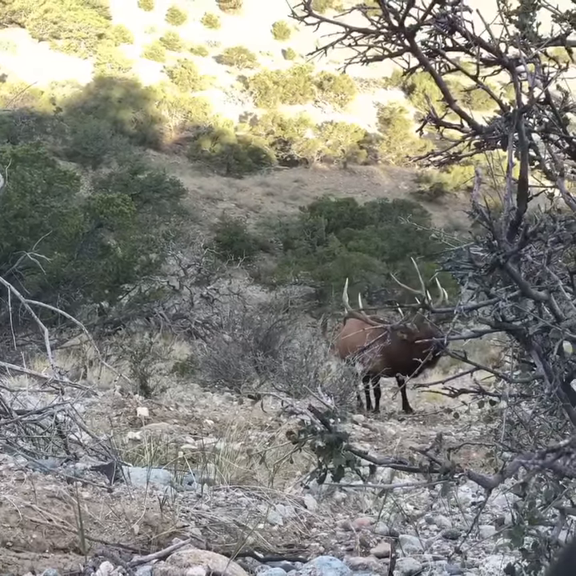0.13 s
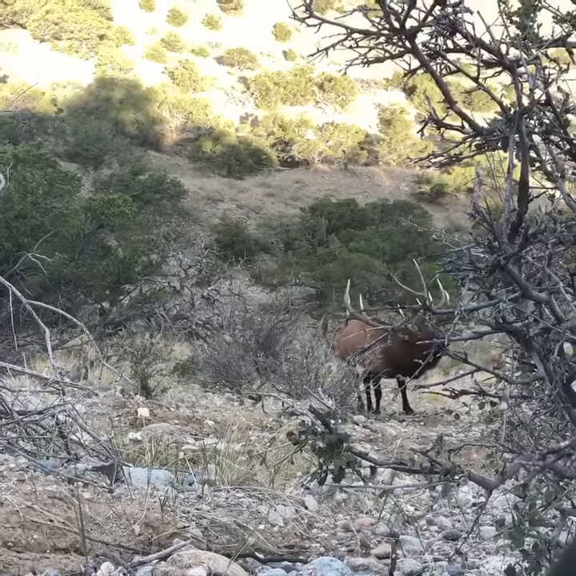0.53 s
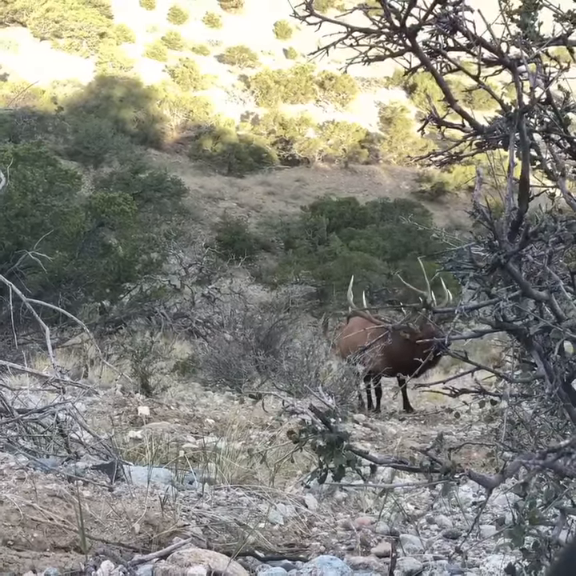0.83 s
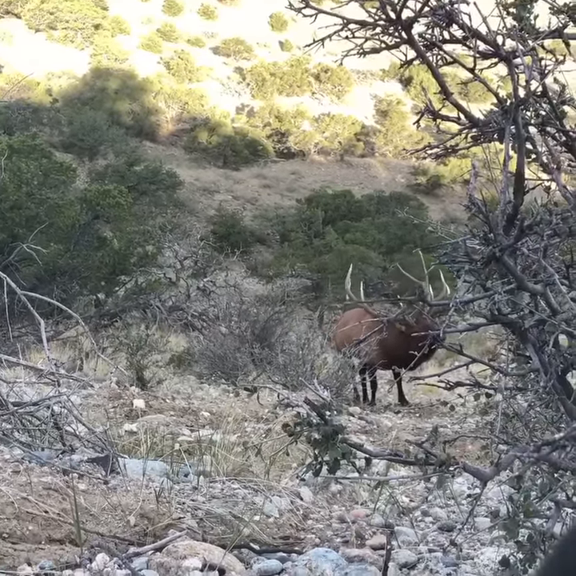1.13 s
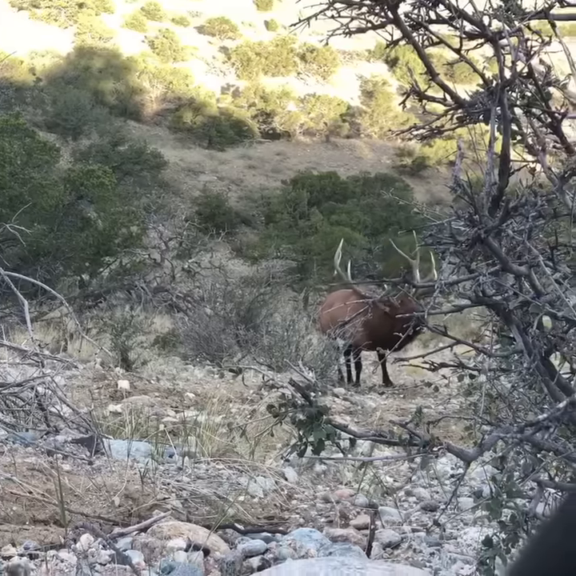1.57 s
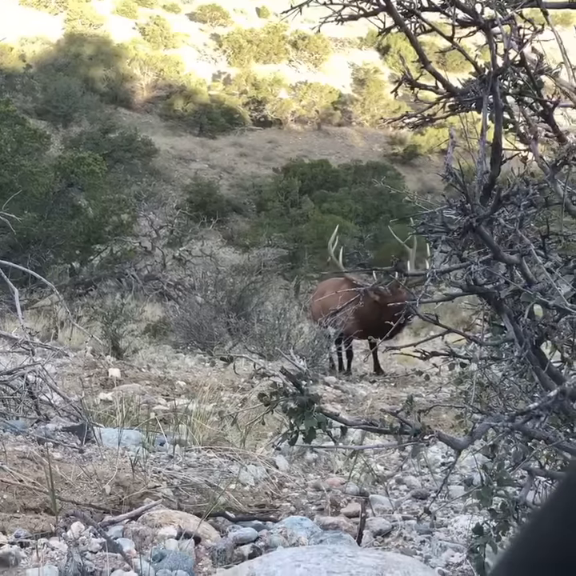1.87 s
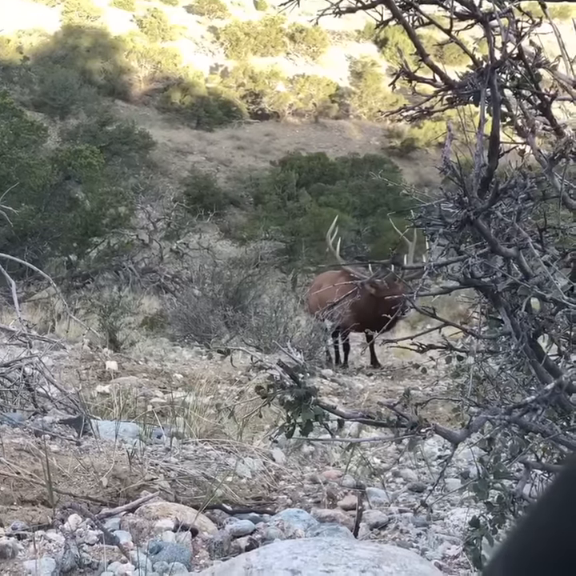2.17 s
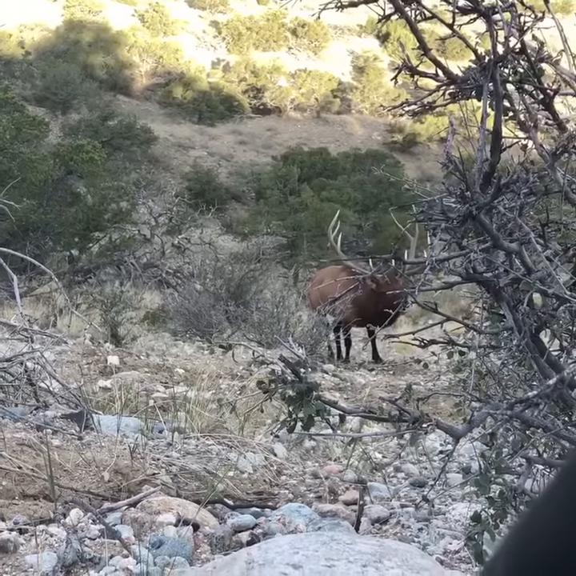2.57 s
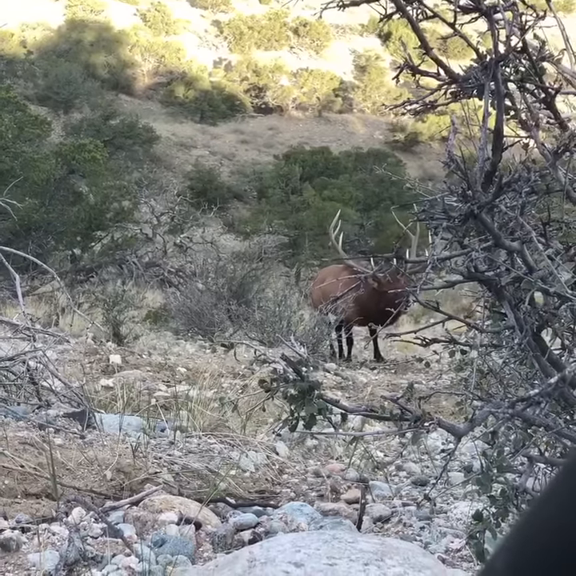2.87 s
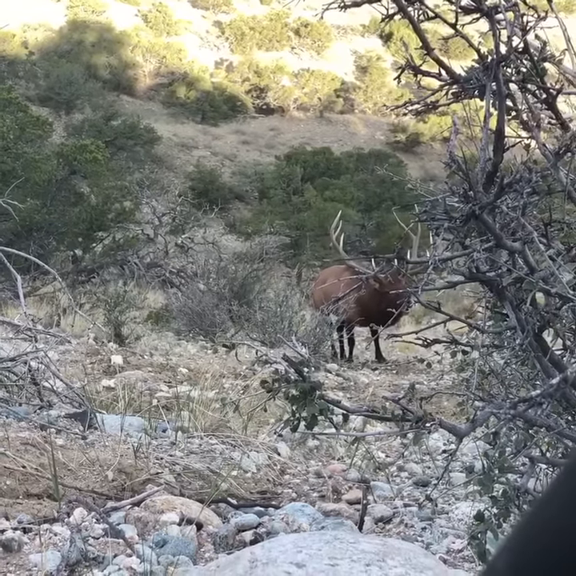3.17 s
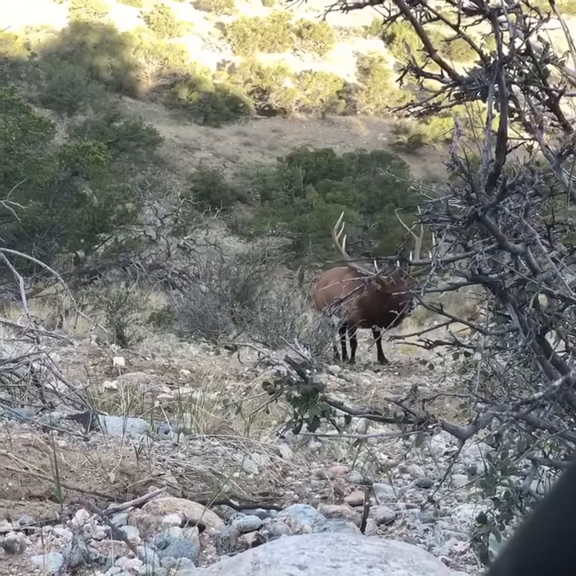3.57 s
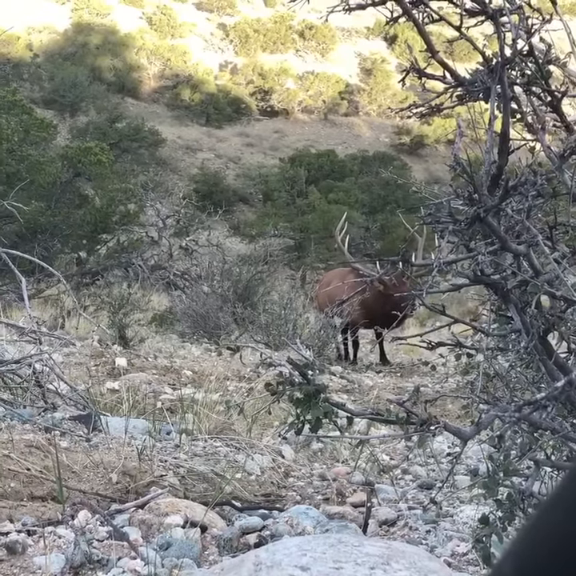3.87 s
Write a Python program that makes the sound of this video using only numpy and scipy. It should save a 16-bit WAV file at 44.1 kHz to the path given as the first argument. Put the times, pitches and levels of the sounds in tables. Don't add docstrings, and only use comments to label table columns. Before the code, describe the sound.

A bull elk's loud, high whistle begins at full strength, gains a second beating tone after 0.15 s, then plunges and frays around 0.3-0.4 s into a short hoarse, airy grunt, gone by 0.5 s. A very faint slope echo and soft pants fade until about 2.2 s. Low wind bumps the microphone from 1.7 s, with a dull knock near 2.7, sparse twig ticks, and tiny brush crunches at 3.9.

```python
import sys
import numpy as np
from scipy import signal
from scipy.fft import rfft, irfft, next_fast_len
from scipy.io import wavfile
from scipy.ndimage import uniform_filter1d, map_coordinates

SR = 44100
rng = np.random.default_rng(int(sys.argv[2]) if len(sys.argv) > 2 else 0)


def master(y):
    cut = np.clip(np.atleast_2d(y).T, -1, 1)
    pcm = np.round(cut * 32767)
    wavfile.write(sys.argv[1], SR, pcm.astype(np.int16))


def convert_level_to_amplitude(level_db):
    exponent = np.asarray(level_db, float) / 20
    return 10 ** exponent


N = 176400
TIME = np.arange(N) / SR

# (time [s], pitch [Hz], rms level [dB])
STEADY_WHISTLE = [(0, 2146, -21), (.05, 2135, -22.5), (.14, 2132, -22), (.22, 2103, -23), (.265, 2074, -24),
                  (.289, 2015, -29), (.315, 1925, -17), (.338, 1845, -25), (.356, 1800, -34)]
# (time [s], pitch [Hz], rms level [dB])
PLUNGING_WHISTLE = [(.125, 2497, -52), (.165, 2491, -32), (.26, 2420, -26), (.295, 2398, -26),
                    (.32, 2250, -29), (.347, 1700, -22), (.372, 1150, -29), (.396, 400, -33),
                    (.425, 170, -38)]
# (multiple of steady pitch [-], multiple of plunging pitch [-], level under weaker whistle, or
# under the steady one where the second multiple is 0 [dB])
EXTRA_TONES = [(2, 0, -24), (3, 0, -38), (-1, 2, -11), (1, 1, -14.5), (2, -1, -20.5), (-2, 3, -26),
               (2, 1, -27.5), (3, -1, -28.5), (-2, 2, -26), (-1, 1, -37.5), (0, 2, -41.5), (-1, 3, -39.5),
               (1, 2, -39), (7, 0, -66), (-3, 3, -31)]
HALO_DB = [-19, -24.5]
# (centre [Hz], width [Hz], level [dB])
THROAT = [(210, 70, -2), (349, 80, -1), (603, 60, -1), (716.8, 45, 2), (1030, 100, -0.5), (1350, 150, -2),
          (1538, 55, 2.5), (1915.6, 190, 1.5), (2520, 450, -3), (2994, 300, -1), (3300, 400, -5.5),
          (3900, 600, -6.5), (5000, 1200, -14), (6400, 1100, -15)]
# (time [s], pitch [Hz], rms level [dB])
FOLDS = [(.28, 120, -70.5), (.31, 128, -52.5), (.34, 132, -43.5), (.36, 136, -38.5), (.38, 112, -44),
         (.405, 92, -43.5), (.43, 75, -65)]
FOLD_OVERTONES_DB = [-8.5, -17, -19]
# (time [s], rms level [dB], open-throat share [0-1], brightness [0-1])
BREATH = [(0, -46, .01, .1), (.15, -46, .03, 0.1), (.272, -45, .04, 0.13), (.292, -37, .8, 0.1),
          (.345, -32, 0.68, 1), (.41, -32.5, .8, 0.53), (.44, -38.5, .8, 0.5), (.478, -52.5, .9, 0.22),
          (.51, -73, .9, 0.2)]
# (start [s], length [s], rms level [dB])
PANTS = [
    (0.464, .2, -67),
    (0.597, 0.26, -64),
    (0.908, 0.13, -66),
    (1.002, .14, -72),
    (1.143, 0.33, -76),
    (1.597, 0.57, -78),
]
# (frequency [Hz], time [s])
SLOPE_FADE = [(200, .5), (2000, .4), (8000, .2)]
# (time [s], peak level [dB], pitch [Hz], time to fade by 60 dB [s])
TICKS = [(.6, -61.5, 6300, 0.0077), (1.646, -62, 6300, .006), (2.693, -58, 6260, 0.0051),
         (3.738, -59, 6400, .005), (2.851, -60, 1200, .01), (3.309, -62, 1290, 0.011),
         (3.471, -59, 2900, 0.0062), (3.498, -60.5, 1097, .012), (3.523, -63, 2500, 0.0076),
         (3.578, -62.5, 2390, 0.0087), (3.68, -69, 2500, .008)]
# (start [s], length [s], peak level [dB])
CRUNCHES = [
    (3.888, .022, -56),
    (3.932, .045, -56),
]
# (time [s], peak level [dB], pitch [Hz], time to fade by 60 dB [s])
KNOCK = (2.725, -47, 150, .06)
# (time [s], rms level [dB])
GUSTS = [(0.6, -72), (0.71, -79), (1.39, -76.5), (1.42, -82.5), (1.73, -66), (1.74, -59.5), (2.25, -61),
         (2.28, -71.5), (2.72, -61), (2.75, -54.5), (2.79, -70), (2.97, -72), (3.0, -55), (3.17, -68.5),
         (3.78, -71), (3.81, -81), (4.0, -68.5)]
# (frequency [Hz], level [dB])
RUMBLE_COLOUR = [(12, -45), (25, -15), (43, -1), (65, 0), (105, -7), (170, -22.5), (300, -34), (600, -70)]
# (frequency [Hz], level [dB])
HUSH_COLOUR = [(70, -30.5), (120, -2), (300, -9), (700, -15), (1500, -22), (7000, -26.5), (12000, -29.5),
               (16000, -34.5)]


def unit(x):
    return x / np.sqrt(np.mean(x ** 2) + 1e-20)


def along(points, hz):
    f, value = np.transpose(points)
    return np.interp(np.log(hz + 1), np.log(f + 1), value)


def curves(rows):
    s, *columns = np.transpose(rows)
    return [uniform_filter1d(np.interp(TIME, s, column), size=300) for column in columns]


def wobble(rate):
    knots = rng.standard_normal(int(N * rate / SR) + 4)
    return map_coordinates(knots, [np.arange(N) * rate / SR])


def filtered(x, response):
    m = next_fast_len(N + SR // 2)
    spectrum = rfft(x, m) * response(np.fft.rfftfreq(m, 1 / SR))
    return irfft(spectrum, m)[..., :N]


def phase(hz):
    return 2 * np.pi * np.cumsum(hz) / SR


def lasting(rows):
    fade = np.clip(1 - (TIME - rows[-1][0]) / .012, 0, 1)
    return fade * (TIME >= rows[0][0])


def throat(f):
    total = 0
    for k, (centre, width, db) in enumerate(THROAT):
        ring = 1j * f * width / (centre ** 2 - f ** 2 + 1j * f * width)
        total = total + (-1) ** k * convert_level_to_amplitude(db) * ring
    return total


def whistles():
    jitter_hz, shimmer_db = 6, .4
    hz1, db1 = curves(STEADY_WHISTLE)
    hz2, db2 = curves(PLUNGING_WHISTLE)
    loose = np.clip((2100 - hz2) / 250, 0, 1)
    firm = 1 - loose
    phase1 = phase(hz1 + jitter_hz * wobble(250))
    phase2 = phase(hz2 * (1 + .045 * loose * wobble(200)) + jitter_hz * wobble(250))
    level1 = convert_level_to_amplitude(db1 + shimmer_db * wobble(300)) * lasting(STEADY_WHISTLE)
    level2 = convert_level_to_amplitude(db2 + shimmer_db * wobble(300)) * lasting(PLUNGING_WHISTLE)

    tones = level1 * np.sin(phase1) + level2 * firm * np.sin(phase2)
    for m, n, db in EXTRA_TONES:
        m, n = round(m), round(n)
        parent = np.minimum(level1, level2) if n else level1
        level = convert_level_to_amplitude(db + 2.5 * wobble(40)) * parent * firm
        tones = tones + level * np.sin(m * phase1 + n * phase2)

    halo = 0
    for k, db in enumerate(HALO_DB):
        halo = halo + convert_level_to_amplitude(db) * wobble(700) * np.sin((k + 2) * phase1)
    halo = halo * level1 * convert_level_to_amplitude(-18.5)

    frayed = level2 * loose * convert_level_to_amplitude(-1 + 4.5 * wobble(120)) * np.sin(phase2)
    ringing_tones = filtered(tones, lambda f: 1 + convert_level_to_amplitude(-22) * throat(f))
    return np.sqrt(2) * (ringing_tones + halo + filtered(frayed, lambda f: throat(f) ** 2))


def grunt():
    hz, db = curves(FOLDS)
    swing = phase(hz * (1 + 0.097 * wobble(60)))
    tone = np.sin(swing)
    for k, overtone_db in enumerate(FOLD_OVERTONES_DB):
        tone = tone + convert_level_to_amplitude(overtone_db) * np.sin((k + 2) * swing)
    return np.sqrt(2) * convert_level_to_amplitude(db) * tone * lasting(FOLDS) + breath(swing)


def breath(swing):
    rasp_db, chop_depth = 3.5, .5
    db, open_share, bright = curves(BREATH)
    level = convert_level_to_amplitude(db + rasp_db * open_share * wobble(140))
    chopped = 1 + chop_depth * open_share * np.sin(swing)
    air = level * throat_air(open_share, bright) * chopped
    spray = convert_level_to_amplitude(-60 + .3 * db) * rng.standard_normal(N)
    return (air + spray) * lasting(BREATH)


def throat_air(open_share, bright):
    noise = rng.standard_normal(N)

    def near_whistle(f):
        darker_below = 1 - (1 - convert_level_to_amplitude(-18)) / (1 + (f / 1750) ** 12)
        return darker_below / (1 + (f / 2776) ** 16)

    full = unit(filtered(noise, lambda f: throat(f) * (np.abs(throat(f)) + 0.8)))
    dull = filtered(full, lambda f: 1 / (1 + (f / 1410) ** 4))
    open_air = dull + bright * (full - dull)
    jet = unit(filtered(noise, lambda f: throat(f) ** 2 * near_whistle(f)))
    open_share = np.clip(open_share, 0, 1)
    return (1 - open_share) * jet + open_share * open_air


def pants():
    swell = np.zeros(N)
    for start, length, db in PANTS:
        progress = np.clip((TIME - start) / length, 0, 1)
        swell += convert_level_to_amplitude(db) * np.sin(np.pi * progress) ** .8

    def colour(f):
        return (np.abs(throat(f)) ** 1.18 + 0.22) / (1 + (f / 2900) ** 5)

    return swell * unit(filtered(rng.standard_normal(N), colour))


def slope(x):
    hz, t, z = signal.stft(rng.standard_normal(SR), SR, nperseg=256)
    fading = z * convert_level_to_amplitude(-60 * t / along(SLOPE_FADE, hz)[:, None])
    tail = signal.istft(fading, SR, nperseg=256)[1]
    return signal.fftconvolve(x, tail / np.linalg.norm(tail))[:N]


def twigs():
    snaps = []
    for start, length, db in CRUNCHES:
        for when, weakness, height in rng.random((24, 3)):
            hz = 800 * 6 ** height
            snaps.append((start + length * when, db - 9 * weakness, hz, 5.2 / hz))
    x = np.zeros(N + SR)
    t = np.arange(SR // 8) / SR
    for start, db, hz, t60 in [*TICKS, *snaps, KNOCK]:
        first = round(start * SR)
        x[first:first + len(t)] += convert_level_to_amplitude(db - 60 * t / t60) * np.sin(2 * np.pi * hz * t)
    return x[:N]


def breeze():
    db, = curves(GUSTS)
    rumble = filtered(rng.standard_normal(N), lambda f: convert_level_to_amplitude(along(RUMBLE_COLOUR, f)))
    buffeting = convert_level_to_amplitude(db) * unit(rumble * convert_level_to_amplitude(3 * wobble(13)))
    hush = unit(filtered(rng.standard_normal(N), lambda f: convert_level_to_amplitude(along(HUSH_COLOUR, f))))
    return buffeting + convert_level_to_amplitude(-70.5 + 0.21 * wobble(4.4)) * hush


def scene():
    elk = whistles() + grunt()
    answer = convert_level_to_amplitude(-40) * slope(elk)
    return (elk + answer + pants() + twigs() + breeze())[None]


def low_pass(x):
    return signal.sosfilt(signal.butter(12, 15750, fs=SR, output="sos"), x)


def record(dry):
    return low_pass(dry)


dry = scene()
out = record(dry)
master(out)
```